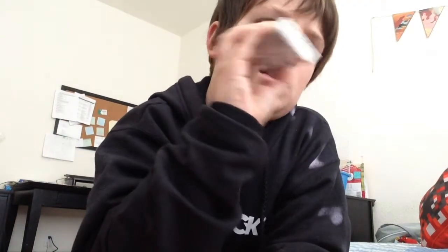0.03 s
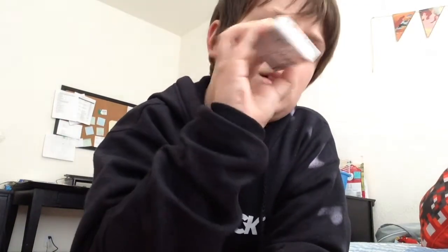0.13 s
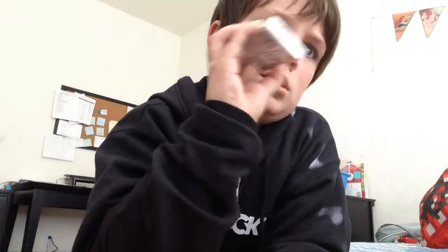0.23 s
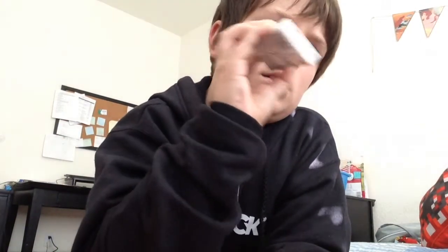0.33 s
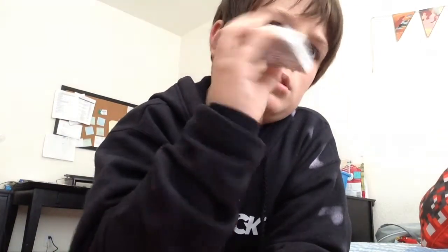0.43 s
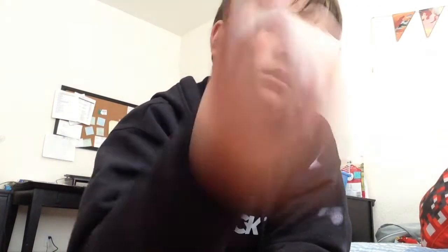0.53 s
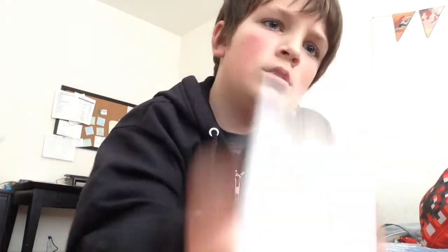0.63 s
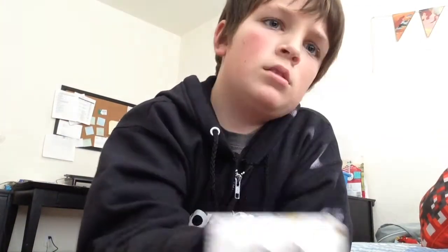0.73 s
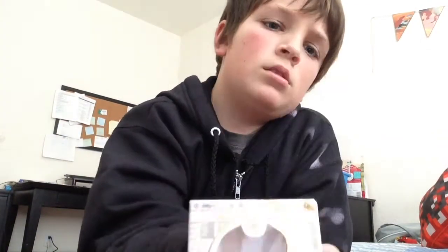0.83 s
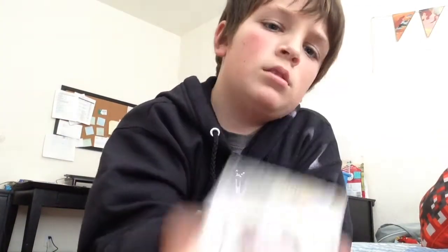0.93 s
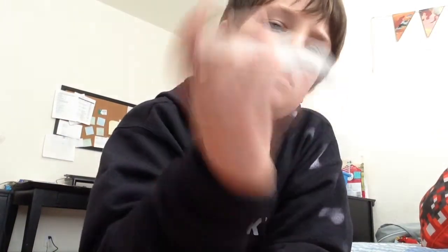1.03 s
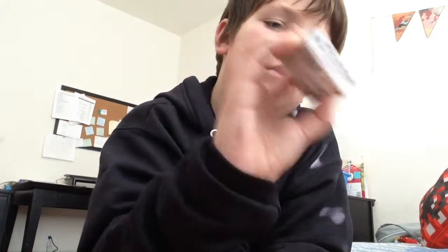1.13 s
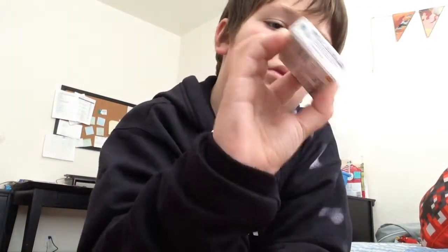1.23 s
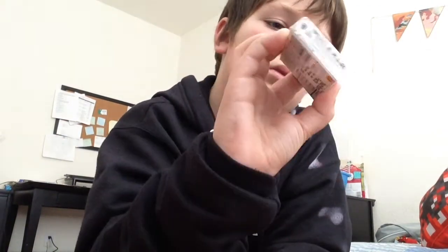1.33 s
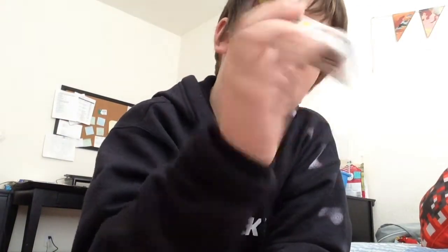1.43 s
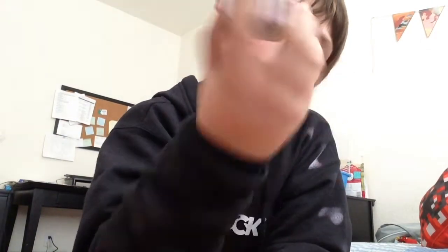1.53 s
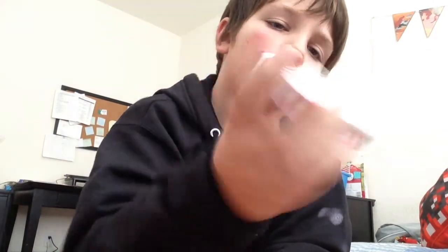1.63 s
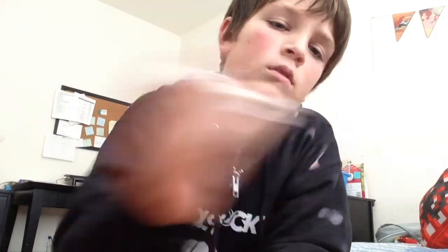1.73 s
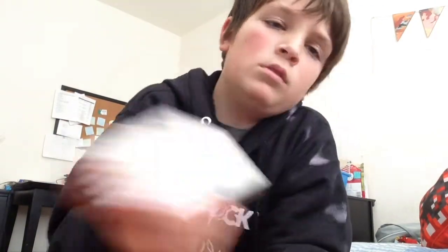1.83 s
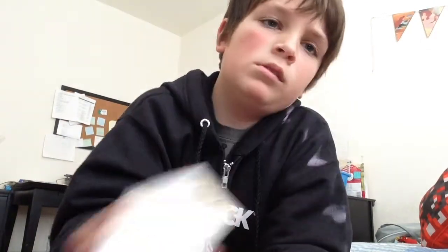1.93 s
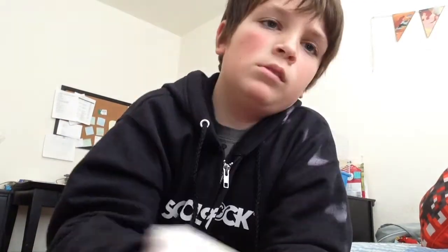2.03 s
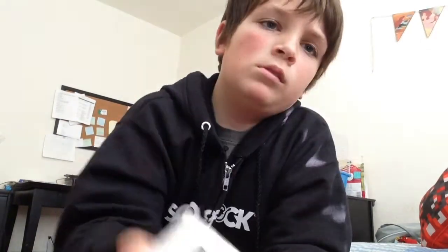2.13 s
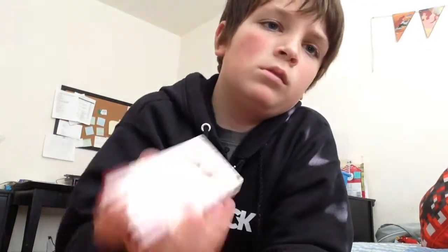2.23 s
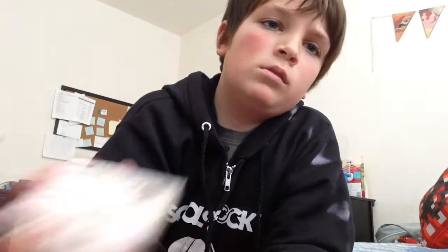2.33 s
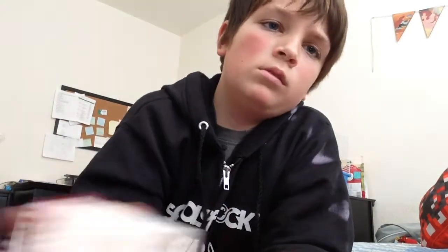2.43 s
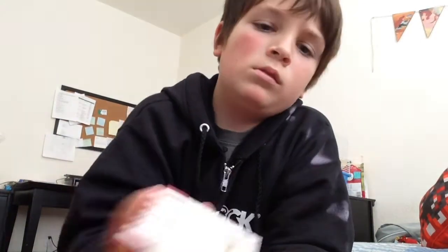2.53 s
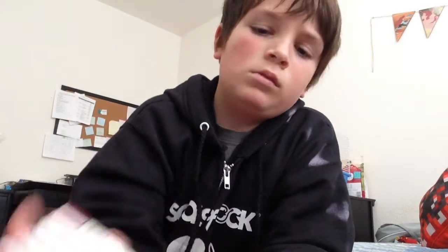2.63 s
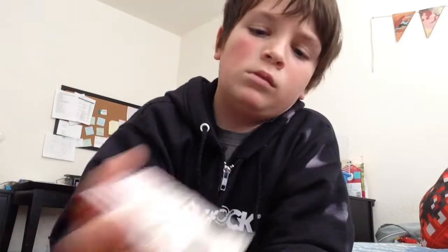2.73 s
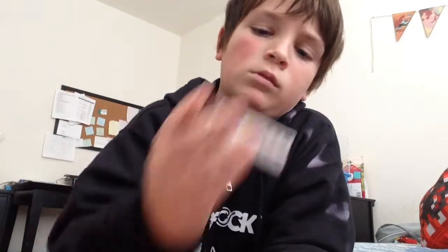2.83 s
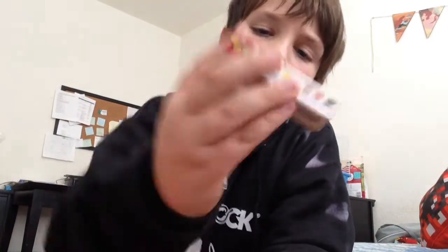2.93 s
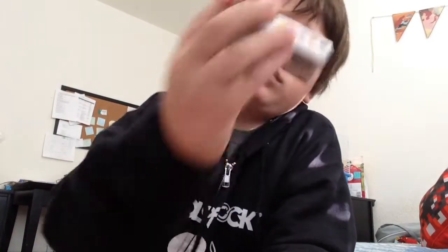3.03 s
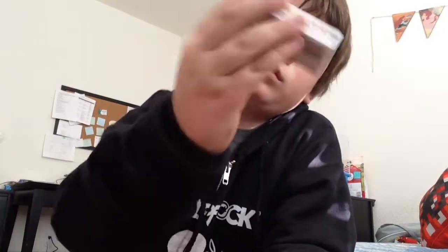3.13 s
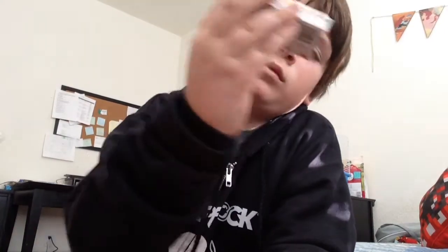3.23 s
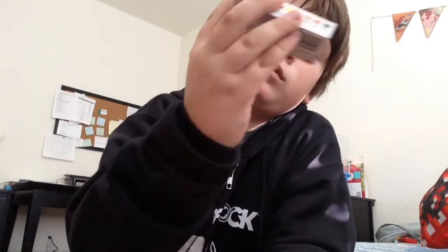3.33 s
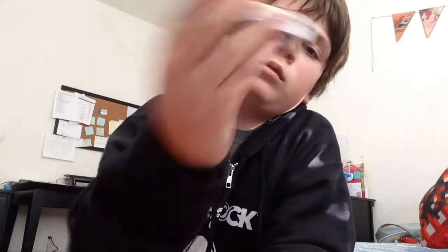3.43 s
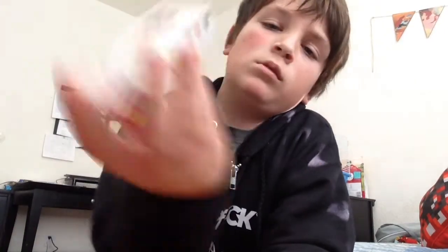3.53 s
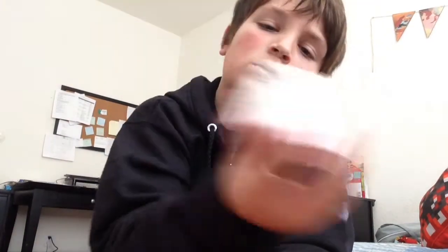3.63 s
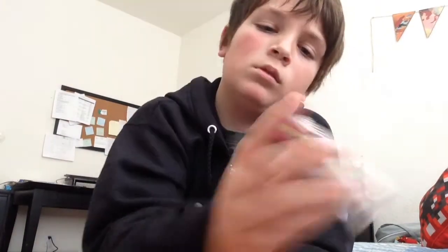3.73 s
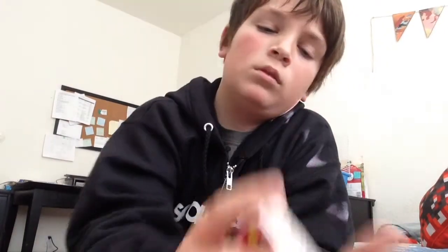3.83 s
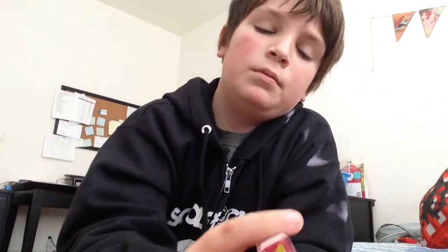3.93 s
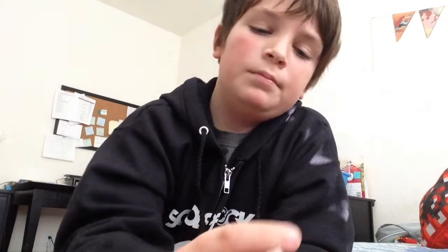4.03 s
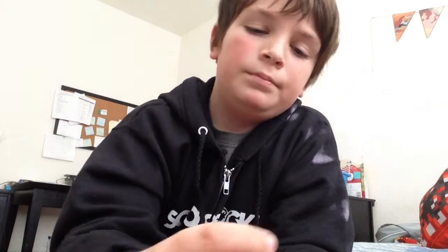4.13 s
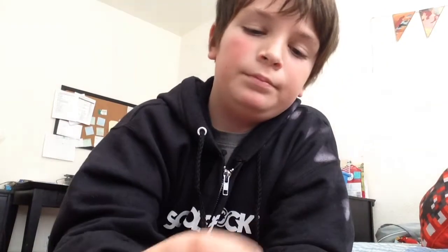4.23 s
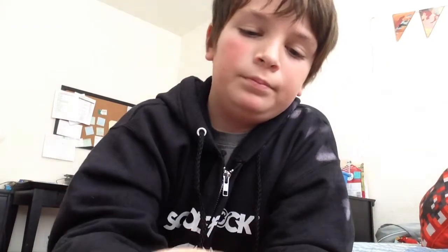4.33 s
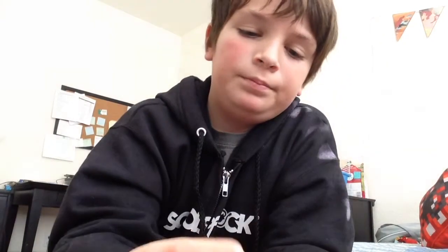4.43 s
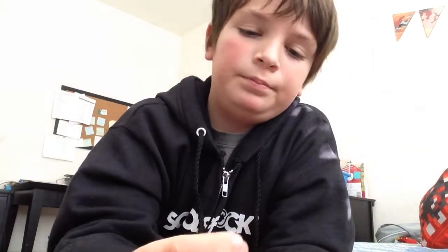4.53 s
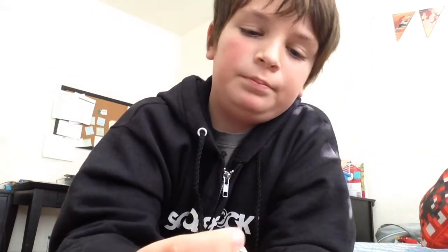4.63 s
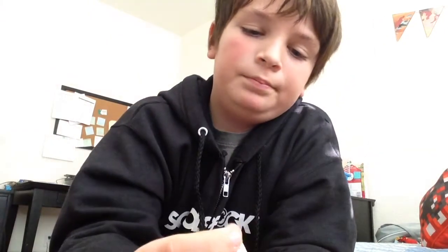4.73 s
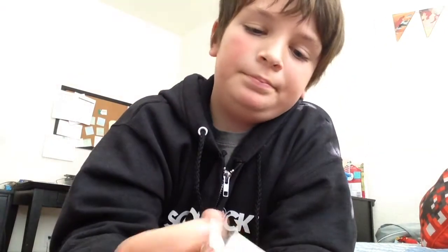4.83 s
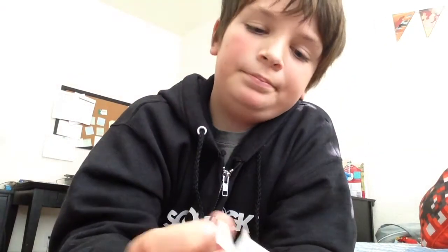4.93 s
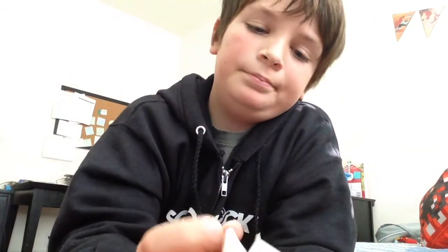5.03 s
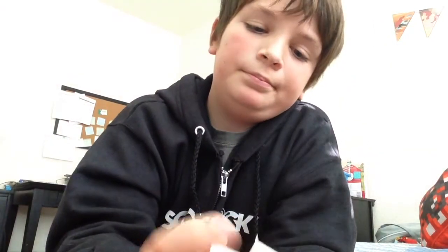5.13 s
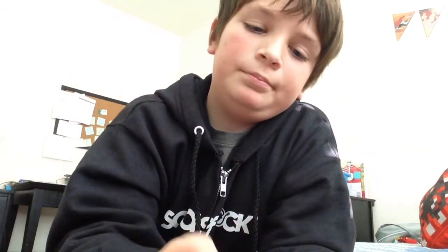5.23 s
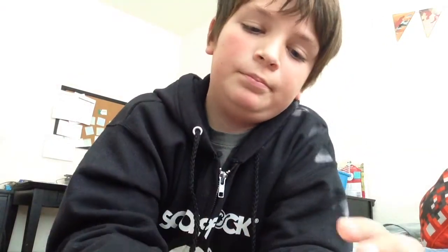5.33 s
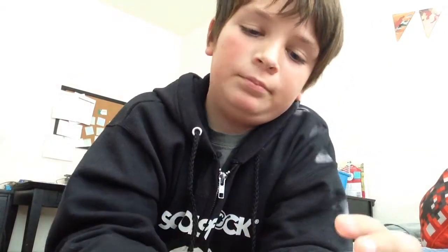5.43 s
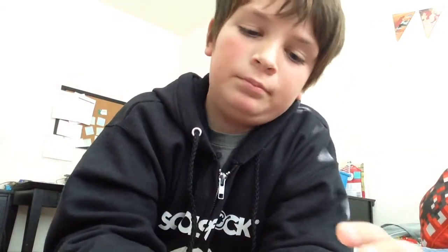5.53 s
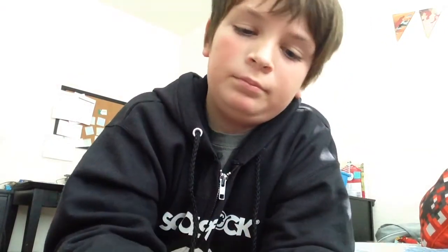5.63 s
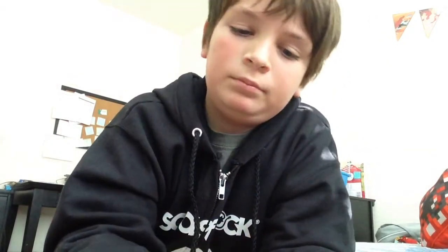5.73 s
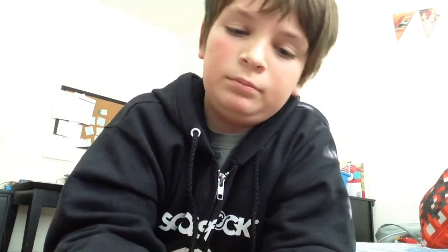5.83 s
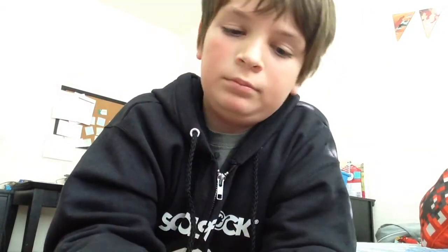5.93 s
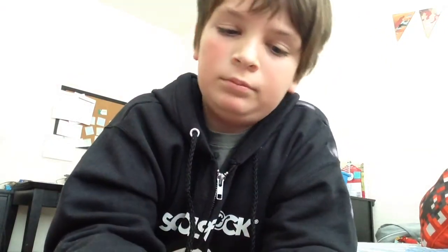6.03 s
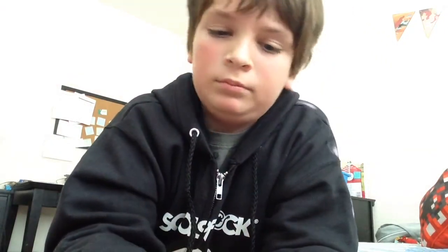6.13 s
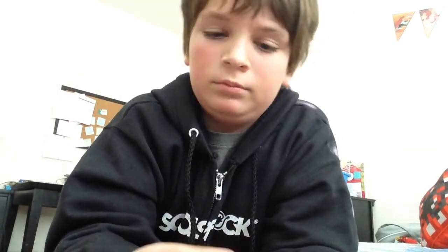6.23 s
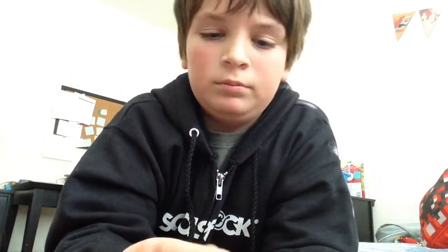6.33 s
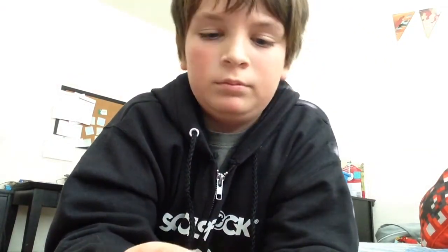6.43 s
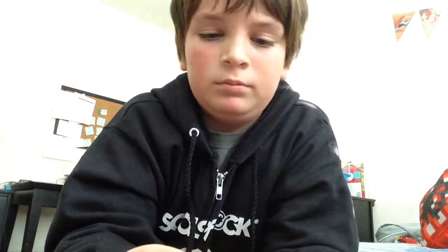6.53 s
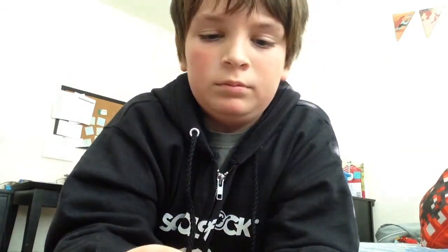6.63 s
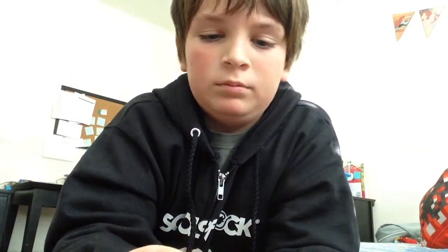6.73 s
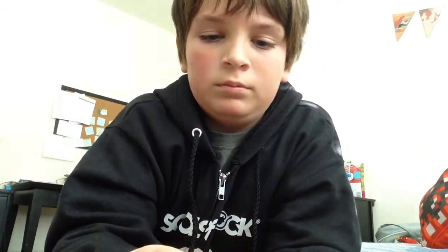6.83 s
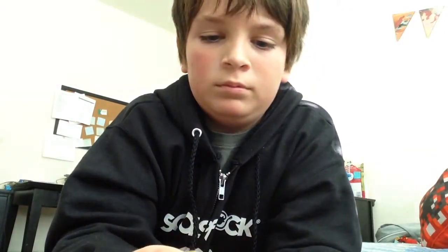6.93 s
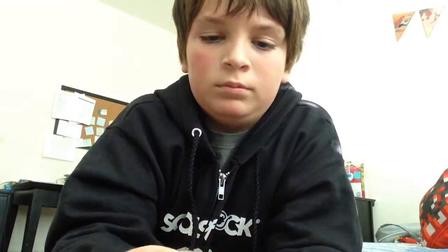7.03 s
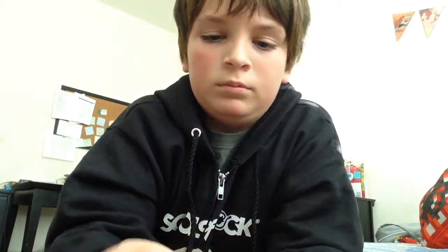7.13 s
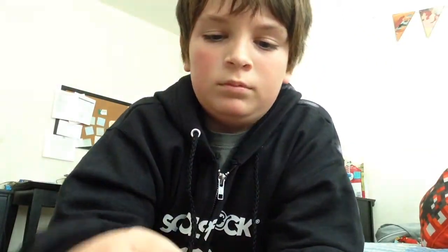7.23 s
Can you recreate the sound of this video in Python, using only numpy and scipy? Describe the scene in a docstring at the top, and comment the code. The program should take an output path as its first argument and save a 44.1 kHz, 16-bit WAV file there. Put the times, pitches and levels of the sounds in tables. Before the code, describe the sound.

Very close in a small room, hard little sweets rattle in a cardboard box. A quick run of shakes, a brief pause, one short shake, then a longer, louder irregular series until about four seconds. Afterwards fingers tap, rub and crinkle the card, busiest midway through the remainder, fading to tiny rustles over faint hiss and hum.

```python
"""Small hard sweets rattle in a cardboard box, shaken close to a microphone in a small room. At each turn of
the hand the heap crashes into a wall as a shower of tiny random contacts, and tumbles in between; the hold on
the box colours the rattle, and bumps ring the low modes of the desk. Then the box is put down and fingered:
struck modes make taps, and coloured contacts make rubs and crinkles. Filtered noise and sine tones give a
steady hiss and a faint hum beneath."""
import sys
import numpy as np
from scipy import signal
from scipy.fft import rfft, irfft
from scipy.io import wavfile
from scipy.ndimage import uniform_filter1d

SR = 44100
rng = np.random.default_rng(int(sys.argv[2]) if len(sys.argv) > 2 else 0)


def transcribe(signal):
    """Save signal, clipped to [-1, 1], as a 16-bit WAV file at the path in sys.argv[1]."""
    frames = np.atleast_2d(signal).T
    limited = np.clip(frames, -1, 1)
    pcm = np.round(limited * 32767).astype(np.int16)
    wavfile.write(sys.argv[1], SR, pcm)


N = 321930
TIME = np.arange(N) / SR   # s

# colour of sweets or fingers on card: hz, level_db (relative, per Hz)
RATTLE_COLOUR = [(60, -54.5), (120, -26), (200, -11), (320, -7.5), (680, -5), (1000, -4.5), (1400, -1),
                 (1850, -3), (2800, -3.5), (4200, -4.5), (5200, -7), (10500, -10.5), (15500, -14.5)]
# crashes of the heap into a wall at each turn of the hand: peak_s, level_db, rise_s, fall_s
WALL_CRASHES = [(0.0, -18.5, .01, 0.021), (.061, -13.5, 0.011, 0.018), (.15, -17.5, 0.013, 0.023),
                (.212, -13.5, 0.0062, 0.024), (.297, -15.5, 0.0095, 0.021), (0.362, -14, 0.0048, 0.02),
                (0.455, -23.5, 0.015, 0.039), (0.611, -21.5, 0.0023, .03), (.635, -18, 0.012, 0.039),
                (.67, -18.5, .003, 0.017), (1.133, -28, 0.007, 0.0054), (1.171, -26.5, .003, 0.006),
                (1.235, -24, .012, 0.02), (1.576, -24.5, 0.0036, .013), (1.653, -15.5, 0.023, 0.035),
                (1.743, -13.5, .007, 0.026), (1.822, -7, 0.0066, 0.018), (1.931, -15.5, 0.0071, 0.033),
                (2.012, -18, 0.0054, 0.049), (2.03, -12.5, 0.0044, 0.02), (2.113, -25, .018, 0.063),
                (2.214, -25.5, .004, 0.048), (2.337, -16, 0.0059, 0.025), (2.449, -13, 0.0037, 0.013),
                (2.47, -15, .008, 0.015), (2.543, -15, 0.0087, 0.036), (2.671, -21.5, 0.013, 0.032),
                (2.708, -20.5, 0.011, 0.019), (2.77, -29, 0.022, 0.017), (2.911, -25.5, 0.023, .031),
                (3.014, -18, 0.012, 0.029), (3.117, -21.5, .011, 0.037), (3.188, -16, 0.0085, 0.028),
                (3.281, -20.5, 0.015, 0.029), (3.344, -19.5, 0.019, 0.024), (3.432, -25, 0.019, 0.029),
                (3.524, -16, 0.0053, 0.018), (3.571, -15.5, 0.036, 0.029), (3.695, -27.5, 0.0047, 0.041),
                (3.726, -17, 0.0063, 0.045), (3.831, -23, 0.015, 0.029), (3.872, -23, 0.028, 0.033),
                (3.984, -26, 0.016, 0.018)]
# edges between the registers of the box
BODY_TOP_HZ, PANEL_BOOM_HZ, TREBLE_HZ = 295, (1000, 1800), 5000


def from_db(db):
    """Decibels to gain."""
    return 10 ** (np.asarray(db) / 20)


def rms_one(x):
    """Scale to rms 1."""
    return x / np.sqrt(np.mean(x ** 2) + 1e-20)


def response(spectrum, size=4096):
    """Causal (minimum-phase) impulse response of unit energy with the given colour."""
    hz, db = np.transpose(spectrum)
    grid = np.maximum(np.arange(size // 2 + 1) * SR / size, 1)
    gain = from_db(np.interp(np.log(grid), np.log(hz), db))
    # folding the cepstrum onto positive time puts the energy as early as possible
    cepstrum = irfft(np.log(gain))
    cepstrum[1:size // 2] *= 2
    cepstrum[size // 2 + 1:] = 0
    h = irfft(np.exp(rfft(cepstrum)))
    return h / np.linalg.norm(h)


def through(x, h):
    """Pass a signal through an impulse response."""
    return signal.fftconvolve(x, h)[:len(x)]


def band(x, hz, kind):
    """One part of the spectrum, in step with the whole."""
    return signal.sosfiltfilt(signal.butter(4, hz, kind, fs=SR, output="sos"), x)


def add(out, s, sound):
    """Mix a short sound in at time s."""
    at = max(round(s * SR), 0)
    out[at:at + len(sound)] += sound[:N - at]


def in_time(rows):
    """Each column of a curve at every sample."""
    s, *columns = np.transpose(rows)
    return [np.interp(TIME, s, column) for column in columns]


def gesture(rows):
    """Gain of a continuous movement, which fades before its first point and after its last."""
    fade_db_per_s = 300
    outside_s = np.abs(TIME - np.clip(TIME, rows[0][0], rows[-1][0]))
    return from_db(in_time(rows)[0] - fade_db_per_s * outside_s)


def swell(s, rise_s, fall_s, onset=1.6, decay=1.0):
    """Start time and gain of a swell that builds up to time s and dies away."""
    t = TIME[max(int((s - 3 * rise_s) * SR), 0):int((s + 5 * fall_s) * SR)]
    away = np.abs(t - s)
    rising, falling = (away / rise_s) ** onset, (away / fall_s) ** decay
    return t[0], np.exp(-np.where(t < s, rising, falling))


def background():
    """Coloured noise makes a steady hiss; sine tones make a faint hum."""
    # colour of the hiss: hz, level_db (relative, per Hz)
    hiss_colour = [(35, -81), (60, -39.5), (91, -31), (107, -16.5), (129, -9), (144, -18), (158, -3),
                   (178, -7), (229, -10.5), (257, -8.5), (480, -12), (605, -18), (15000, -26)]
    # steady tones of the hum: hz, rms_db
    hum_tones = [(120, -73.5), (175, -68.5), (220, -82), (480, -78.5)]
    out = from_db(-63) * through(rng.standard_normal(N), response(hiss_colour))
    for hz, rms_db in hum_tones:
        out += from_db(rms_db) * np.sqrt(2) * np.sin(2 * np.pi * (hz * TIME + rng.random()))
    return out


def room(x, size=22050):
    """Diffuse reflections of a small room, as decaying noise that is weakest around 6 kHz."""
    first_s, t60_s, level_db = 0.0062, 0.3, -13
    t = TIME[:size]
    tail = rng.standard_normal(size) * from_db(-60 * t / t60_s) * (t > first_s)
    walls = response([(200, 3.5), (2500, 4), (6000, -1), (15000, 2.0)])   # hz, relative dB
    return from_db(level_db) * through(x, through(tail / np.linalg.norm(tail), walls))


def desk(size=16384):
    """A soft bump rings the low modes of the desk under the microphone."""
    # modes of the desk: hz, level_db (relative), t60_s
    desk_modes = [(81, -24, .16), (149, 8, 0.13), (171, 10, 0.13), (215.6, -3, 0.1)]
    # bumps on the desk: start_s, peak_db
    bumps = [(2.81, -21), (2.824, -18.5), (6.773, -45)]
    out, t = np.zeros(N), TIME[:size]
    thud = sum(from_db(db - 60 * t / t60) * np.sin(2 * np.pi * hz * t) for hz, db, t60 in desk_modes)
    for s, peak_db in bumps:
        add(out, s, from_db(peak_db) * thud / np.abs(thud).max())
    return out


def in_box(x):
    """Each resonance of the box and its air lifts or lowers its own narrow range and rings on."""
    # resonances: hz, width_hz, boost_db
    resonances = [(472, 84, 5.5), (807, 81, 5.5), (1172, 220, 5), (1387, 71, 2), (1584, 35, 3.5),
                  (1850, 28, -2), (2220, 27, 6.5), (2400, 70, 3), (3055, 130, 2.5), (3760, 170, -2),
                  (6100, 54, 4), (6350, 70, 4.5), (8240, 200, 2), (10320, 120, 2.5)]
    for hz, width_hz, boost_db in resonances:
        ringing = signal.lfilter(*signal.iirpeak(hz, hz / width_hz, fs=SR), x)
        x = x + (from_db(boost_db) - 1) * ringing
    return x


def scatter(decay_s, share, count=1, size=1024):
    """Contacts followed by reflections within the box, one row per spot; about unit energy."""
    tail = rng.standard_normal((count, size)) * np.exp(-TIME[:size] / decay_s)
    tail *= share / np.linalg.norm(tail, axis=1, keepdims=True)
    tail[:, 0] = 1   # the contact itself
    return tail / np.sqrt(1 + share ** 2)


def contacts(per_s, spread_db, even_s, decay_s, share, size=512):
    """Random contacts of uneven force; every 12 ms they land on a new spot with its own colour."""
    force = from_db(spread_db * np.minimum(rng.exponential(1, N), 4)) * rng.choice([-1, 1], N)
    clicks = force * (rng.random(N) < per_s / SR)
    # evens the force over a short time, so the sound stays dense and steady
    nearby_power = uniform_filter1d(clicks ** 2, max(int(even_s * SR), 2))
    clicks /= np.sqrt(np.abs(nearby_power) + 1e-6)
    groups = np.pad(clicks, (0, -N % size)).reshape(-1, size)
    spots = scatter(decay_s, share, count=len(groups))
    out = np.zeros(N)
    for k, sound in enumerate(signal.fftconvolve(groups, spots, axes=1)):
        add(out, k * size / SR, sound)
    return rms_one(out)


def knock(colour, decay_s, share):
    """One contact at a random spot, with peak 1."""
    sound = through(colour, scatter(decay_s, share)[0])
    return sound / np.abs(sound).max()


def registers(card, ticks):
    """Split the sound of the box into its clack, low body, hollow, panel boom and treble."""
    body = band(card, BODY_TOP_HZ, "low")
    below_boom, below_clack = (band(card, hz, "low") for hz in PANEL_BOOM_HZ)
    below_treble = band(card, TREBLE_HZ, "low")
    clack, hollow, boom = below_treble - below_clack, below_boom - body, below_clack - below_boom
    return [clack, body, hollow, boom, band(ticks, TREBLE_HZ, "high")]


def coloured(parts, *levels_db):
    """Mix the registers, each relative to the clack."""
    return parts[0] + sum(from_db(db) * part for db, part in zip(levels_db, parts[1:]))


def rubs():
    """Fingers and flaps stick and slip on the card, in one long drag and several short rubs."""
    # short rubs: peak_s, level_db, length_s, hollow_db, panel_boom_db, treble_db
    short_rubs = [(0.993, -39, 0.018, -5, -20, -7), (4.262, -58, 0.017, 6, 0, 9),
                  (4.37, -43, .01, 0, -4, -16), (4.61, -58.5, 0.14, 2, -1, 2),
                  (4.86, -35, 0.012, 3.5, 7, 8.5), (4.9, -44.5, 0.056, 0, -12, -0.5),
                  (6.18, -52.5, 0.098, -2, 1, 2.5), (7.082, -51, 0.07, -5.5, -2.5, -5),
                  (7.198, -54.5, 0.035, -3.5, -6, 6.5)]
    # one long drag along the box: time_s, level_db, panel_boom_db, treble_db
    long_drag = [(5.2, -68.5, -7, 6), (5.36, -54, -8, 2), (5.405, -32.5, -8, -9.5), (5.475, -39, 3, -2),
                 (5.495, -30, 2.5, -8), (5.6, -35.5, 2.5, 6), (5.695, -40, -1.5, -4),
                 (5.735, -34, 10, -1.5), (5.79, -33.5, 8.5, 1), (5.84, -43.5, -2, 0),
                 (5.87, -39.5, 9.5, -1), (5.95, -68, -7, -1)]
    body_db, drag_hollow_db = 1.0, -2
    slips = contacts(per_s=1200, spread_db=-0.5, even_s=0.027, decay_s=0.0058, share=1.0)
    catches = contacts(per_s=150, spread_db=3.5, even_s=.04, decay_s=.0008, share=1.0)
    rubbing = rms_one(through(slips + 0.63 * catches, in_box(response(RATTLE_COLOUR))))
    parts = registers(rubbing, rubbing)
    drag_colour_db = in_time(long_drag)[1:]
    out = gesture(long_drag) * coloured(parts, body_db, drag_hollow_db, *drag_colour_db)
    for s, level_db, length_s, *colour_db in short_rubs:
        pressure = np.zeros(N)
        add(pressure, *swell(s, 0.65 * length_s, length_s, onset=0.9, decay=1.05))
        out += from_db(level_db) * pressure * coloured(parts, body_db, *colour_db)
    return out


def tap(top_hz, size=4096):
    """A tap rings the modes of the card, twice in quick succession; a soft one misses the high modes."""
    # modes of the card: hz, level_db (relative), t60_s; each tap varies pitch and level at random
    card_modes = [(450, -1.5, 0.0036), (705, -5, 0.016), (1165, -7, 0.019), (1580, -3.5, 0.0077),
                  (1880, -14, 0.019), (2800, -7, 0.0065), (3420, -18, 0.017), (4450, -15.5, 0.0069),
                  (6570, -17, 0.0054), (8600, -10.5, 0.0029), (12470, -18, 0.0037)]
    vary_db, again_s, again_db, low_hz = 3.0, 0.00169, -2.0, 300
    t, sound = TIME[:size], np.zeros(size)
    for k, (hz, db, t60) in enumerate(card_modes):
        gain = from_db(db + rng.normal(0, vary_db) - 60 * t / t60)
        sound += (-1) ** k * gain * np.sin(2 * np.pi * hz * rng.normal(1, .03) * t)
    lag = int(again_s * rng.uniform(0.47, 1.49) * SR)
    sound = sound + from_db(again_db) * np.pad(sound, (lag, 0))[:size]
    sound = signal.sosfilt(signal.butter(2, [low_hz, top_hz], "band", fs=SR, output="sos"), sound)
    return sound / np.abs(sound).max()


def handling():
    """Fingers rub the card, tap it and snap its creases."""
    # taps on the box: start_s, level_db, upper_edge_hz
    taps = [(0.959, -39.5, 1490), (0.992, -32.5, 1400), (4.3223, -17.5, 9000), (4.3578, -26.5, 9000),
            (4.49, -47, 2000), (4.524, -40, 2500), (4.5576, -30, 2000), (4.575, -45, 1320),
            (4.6005, -29.5, 5000), (4.7, -42, 2200), (4.718, -42, 2030), (4.734, -39.5, 2200),
            (4.948, -30.5, 9900), (4.970, -37.5, 9000), (5.414, -25.5, 1500), (5.516, -25, 1300),
            (5.572, -21, 1500), (6.16, -44, 1500), (6.222, -40, 1620), (6.344, -49, 1600)]
    # creases snapping in the card: start_s, level_db, treble_db (above 4 kHz)
    crinkles = [(0.98, -24.5, 13), (1.013, -22, 7), (4.929, -27, 3), (5.399, -17, -7), (5.414, -13, -6),
                (5.491, -17, -8), (5.516, -22, -3), (5.572, -19, 10), (5.617, -14, 8), (5.667, -18, -2),
                (5.776, -16, -17), (5.866, -22.5, -6), (6.223, -33, -5), (6.270, -38.5, -11),
                (6.293, -36.5, -7), (7.213, -39, 7)]
    # colour of a crease: hz, level_db (relative, per Hz)
    crease_colour = [(150, -20), (600, -26), (1400, 8.5), (2500, -3), (5000, 4), (9000, -14), (15000, -11)]
    trim_db = -0.5
    out = rubs()
    for s, level_db, top_hz in taps:
        add(out, s, from_db(level_db + trim_db) * tap(top_hz))
    for s, level_db, treble_db in crinkles:
        colour = response([(hz, db + treble_db * (hz > 4000)) for hz, db in crease_colour])
        add(out, s, from_db(level_db + trim_db) * knock(colour, decay_s=0.002, share=0.7))
    return out


def crashes():
    """Strength of the heap hitting the walls; overlapping crashes add in power."""
    power = np.zeros(N)
    for s, level_db, rise_s, fall_s in WALL_CRASHES:
        start, shape = swell(s, rise_s, fall_s, onset=1.3, decay=1.39)
        add(power, start, (from_db(level_db) * shape) ** 2)
    return np.sqrt(power)


def sliding():
    """Strength of the tumbling between crashes; it ebbs while the heap is in the air."""
    # sweets sliding about between the crashes: time_s, level_db
    slide_levels = [(0, -31), (.4, -30), (.55, -34), (.59, -26.5), (.72, -29.5), (.78, -49), (1.02, -67.5),
                    (1.21, -24.5), (1.33, -36), (1.445, -51.5), (1.49, -36.5), (1.64, -27), (2.12, -29),
                    (2.31, -37), (2.42, -24.5), (2.64, -35), (3.96, -33), (4.14, -48.5), (4.29, -56)]
    flight_s, lead_s, dip_share = 0.012, 0.03, 0.25   # the heap flies just before each crash
    airborne = np.zeros(N)
    for s, *_ in WALL_CRASHES:
        add(airborne, *swell(s - lead_s, flight_s, flight_s))
    return gesture(slide_levels) * (1 - np.clip(dip_share * airborne, 0, 1))


def showers():
    """Many sweets hit the card and each other, in crashes and in the tumbling between them."""
    # the hold on the box: time_s, low_body_db, hollow_db, panel_boom_db, treble_db
    hold = [(0, 1, 0.5, -4, -0.5), (.2, -4.5, 1, 0.5, 0.5), (.3, -9, -3.5, -1.5, -3), (.38, -1, 1, 2, 0.5),
            (.5, 2, -4, -4, -5.5), (.6, 1.5, 5.5, 0, 1), (.75, 6, -0.5, 0.5, -6.5),
            (1.18, -1.5, -0.5, -7.5, -5.5), (1.36, 1.5, 1, 4.5, -3.5), (1.62, 3.5, 0.5, -3.5, -0.5),
            (1.84, -4, -6, -1.5, -3.5), (1.93, 0.5, -2, 3.5, -1), (2.2, 7, 7, 8, -0.5),
            (2.36, -1.5, -1.5, 6, -0.5), (2.56, -2, -4, 5.5, 0), (2.68, 6, 3, 8, -2), (2.92, 6, 6, 8.5, 1),
            (3.0, 0.5, 0.5, -1.5, -1), (3.36, 2, 0.5, -3.5, -2), (3.75, 0, -1.5, -3, -2),
            (3.86, -2, 2.5, 4.5, -3), (4.3, 13, 4, 4, -2.5)]
    colour = in_box(response(RATTLE_COLOUR))
    colour = colour / np.linalg.norm(colour)
    heap = contacts(per_s=1500, spread_db=2.0, even_s=.006, decay_s=0.0022, share=1.3)
    # sparser, sharper contacts of loose sweets
    strays = contacts(per_s=300, spread_db=2.5, even_s=.014, decay_s=.0008, share=1.2)
    clinks = contacts(per_s=1500, spread_db=-0.5, even_s=0.03, decay_s=0.0012, share=1.0)
    tumbles = contacts(per_s=650, spread_db=2.5, even_s=.016, decay_s=0.0038, share=1.2)
    crash, slide = crashes(), sliding()
    on_card = crash * rms_one(heap + 0.42 * strays) + slide * tumbles
    # the treble carries more strays, and the clinks of sweet on sweet
    ticks = crash * rms_one(heap + 0.99 * strays + clinks)
    ticks += from_db(-1.5) * slide * rms_one(tumbles + 0.5 * clinks)
    return coloured(registers(through(on_card, colour), through(ticks, colour)), *in_time(hold))


def sweets():
    """Showers of sweets, a few hard single hits, and low puffs of air as the whole box is jolted."""
    # single sweets that strike hard: start_s, level_db
    strikes = [(0.208, -14), (.606, -6), (0.712, -11), (.845, -27), (1.134, -16), (1.235, -7.5),
               (1.609, -13), (1.629, -9.5), (1.741, -10.5), (1.815, -7), (1.822, -6), (1.926, -10),
               (2.014, -8), (2.03, -2.5), (2.212, -9.5), (2.334, -11), (2.424, -15.5), (2.45, -3),
               (2.656, -11.5), (2.6958, -2), (2.843, -17.5), (3.01, -11), (3.185, -23), (3.525, -24),
               (3.931, -16)]
    # jolts of the whole box: start_s, peak_db
    jolts = [(1.615, -40), (1.822, -32), (2.028, -40.5), (3.527, -42)]
    # colour of the puff of air: hz, level_db (relative, per Hz)
    puff_colour = [(25, 0), (70, -11), (170, 1), (300, -6.5), (900, -40)]
    strike_trim_db, strike_treble_db = -3.0, -1.0
    out = showers()
    hard = [(hz, db + strike_treble_db * (hz > TREBLE_HZ)) for hz, db in RATTLE_COLOUR]
    hard = in_box(response(hard))
    for s, level_db in strikes:
        add(out, s, from_db(level_db + strike_trim_db) * knock(hard, decay_s=0.0016, share=1.9))
    for s, peak_db in jolts:
        add(out, s, from_db(peak_db) * knock(response(puff_colour), decay_s=.005, share=1.2))
    return out


def scene():
    """The box in its room, the desk and the background."""
    box = sweets() + handling()
    return (box + room(box) + desk() + background())[None]


def record(dry):
    """The largest peaks overload the small microphone, which loses the deep bass; the top is cut steeply."""
    low_hz, top_hz = 83.95, 15400
    overloaded = np.clip(dry, -.9, .9)
    thin = signal.sosfilt(signal.butter(2, low_hz, "high", fs=SR, output="sos"), overloaded)
    return signal.sosfilt(signal.ellip(10, .1, 80, top_hz, fs=SR, output="sos"), thin)


dry = scene()
out = record(dry)
transcribe(out)
```